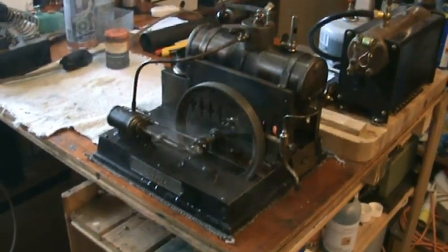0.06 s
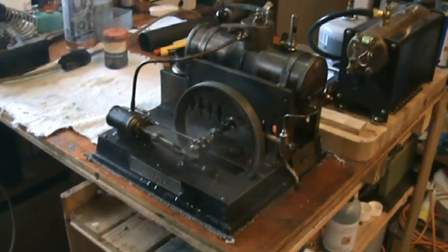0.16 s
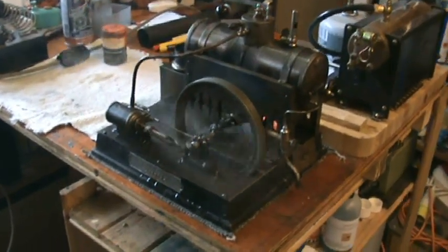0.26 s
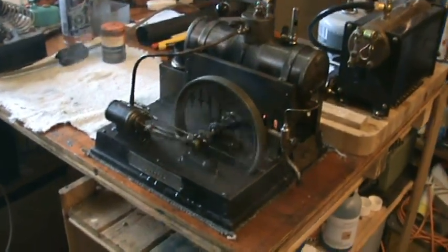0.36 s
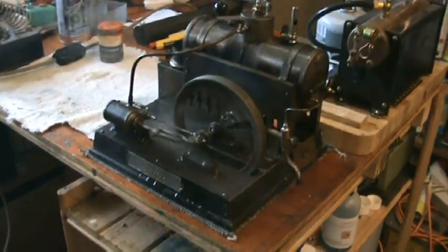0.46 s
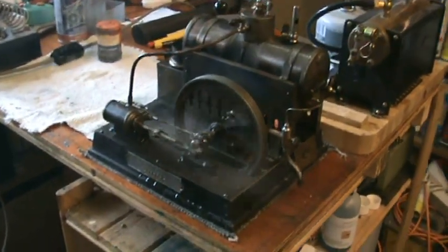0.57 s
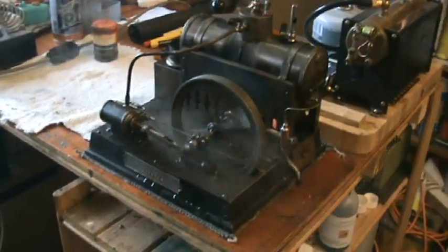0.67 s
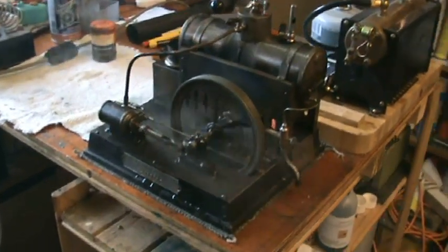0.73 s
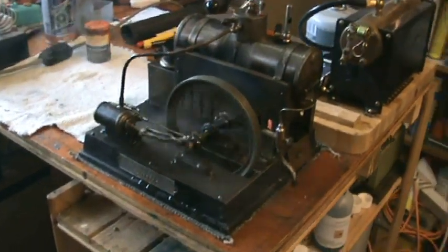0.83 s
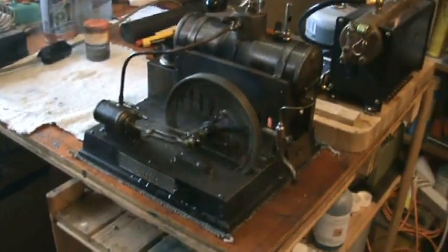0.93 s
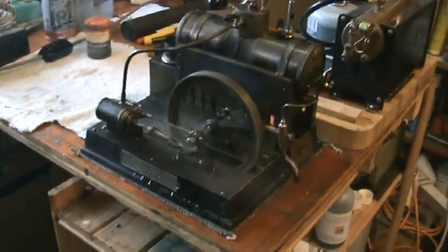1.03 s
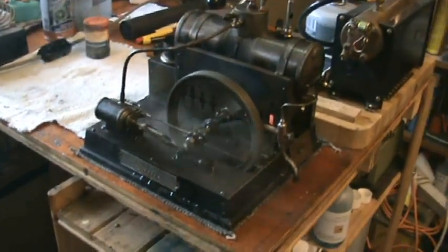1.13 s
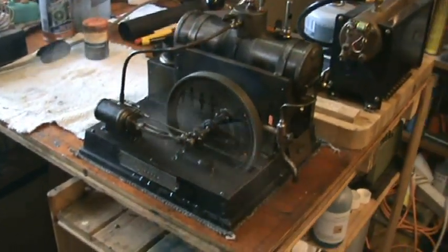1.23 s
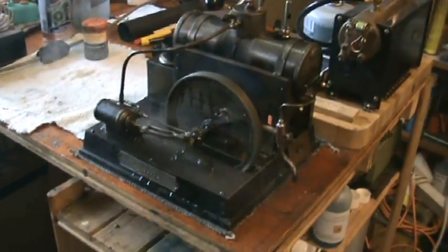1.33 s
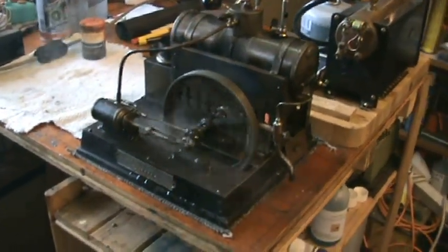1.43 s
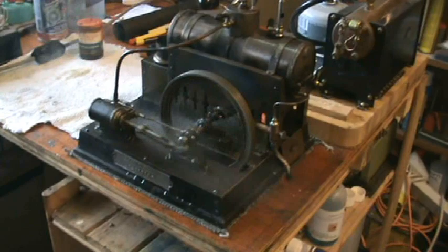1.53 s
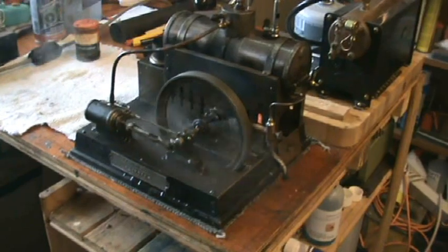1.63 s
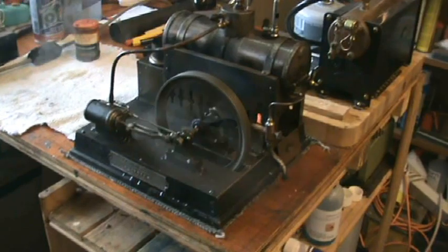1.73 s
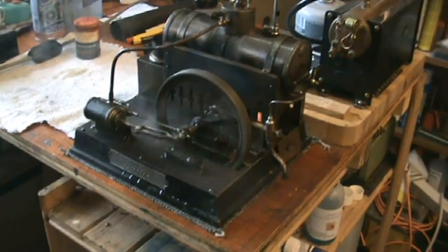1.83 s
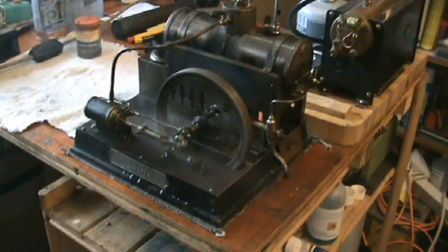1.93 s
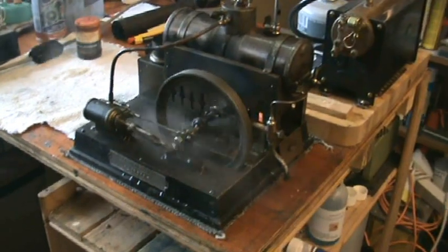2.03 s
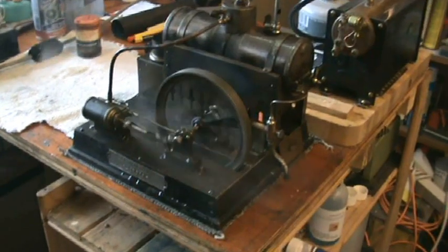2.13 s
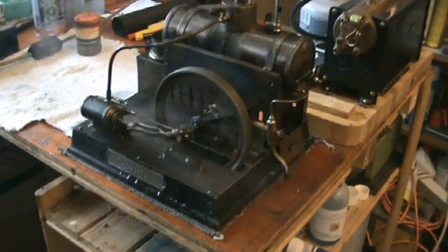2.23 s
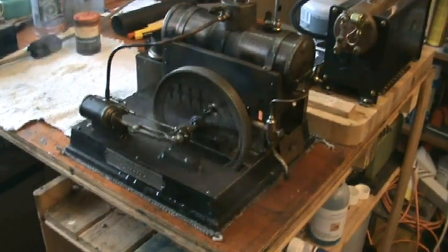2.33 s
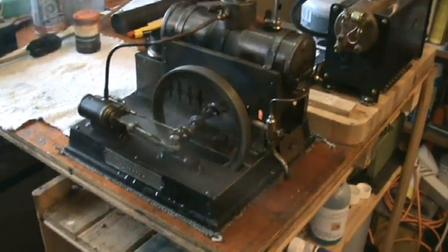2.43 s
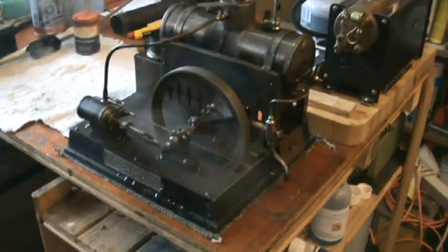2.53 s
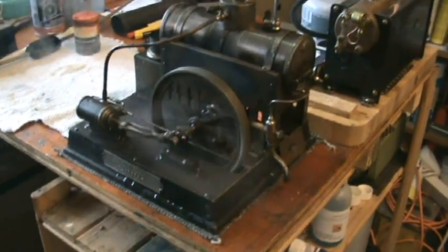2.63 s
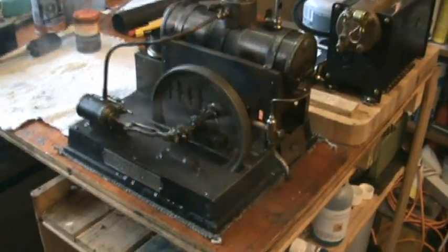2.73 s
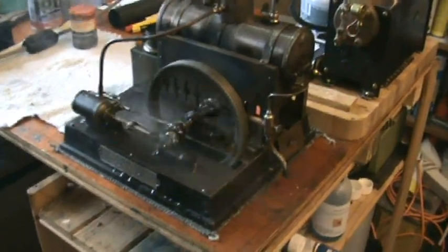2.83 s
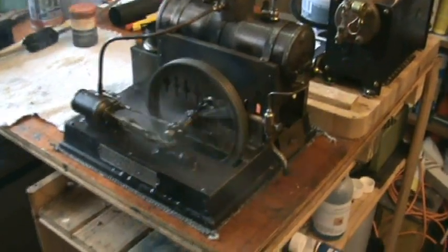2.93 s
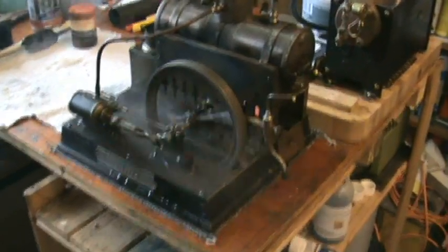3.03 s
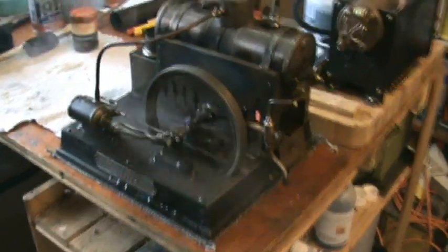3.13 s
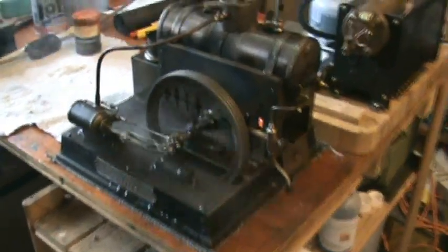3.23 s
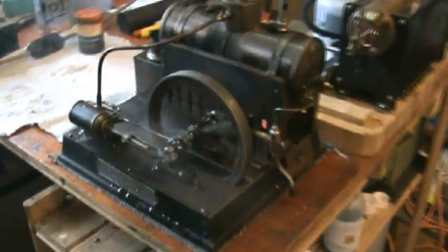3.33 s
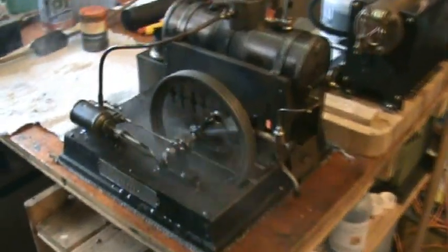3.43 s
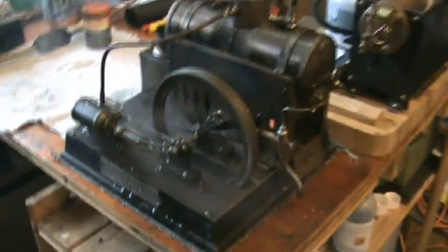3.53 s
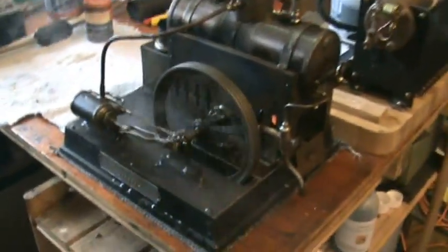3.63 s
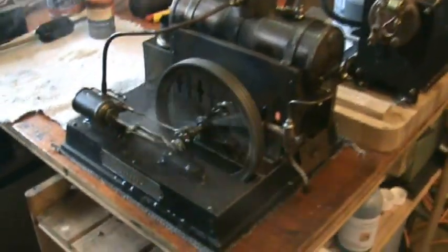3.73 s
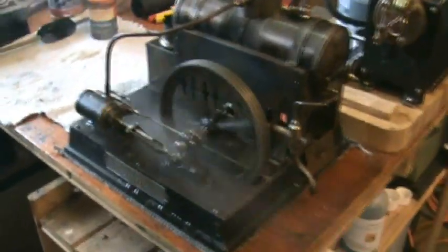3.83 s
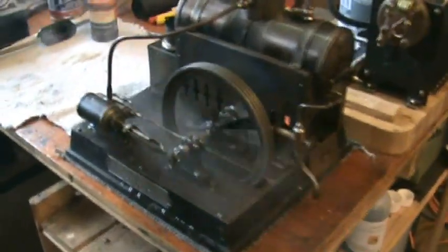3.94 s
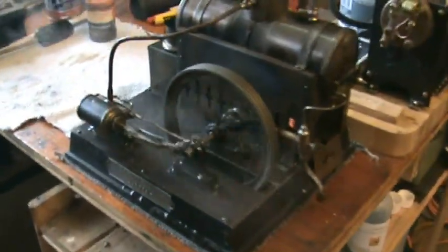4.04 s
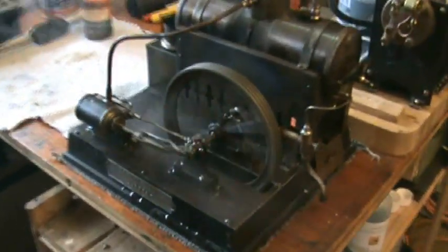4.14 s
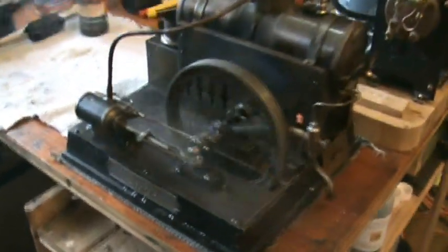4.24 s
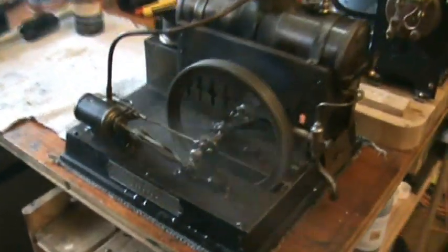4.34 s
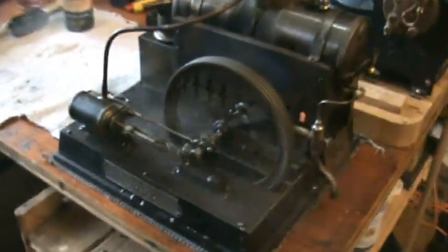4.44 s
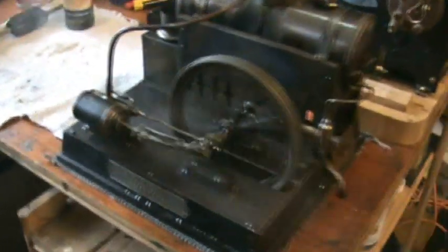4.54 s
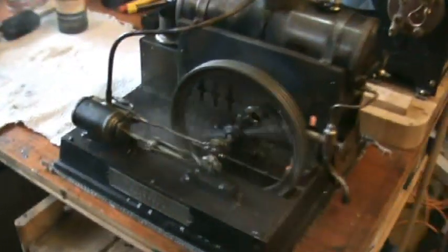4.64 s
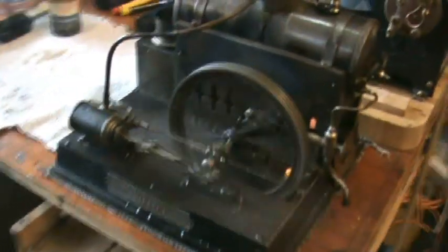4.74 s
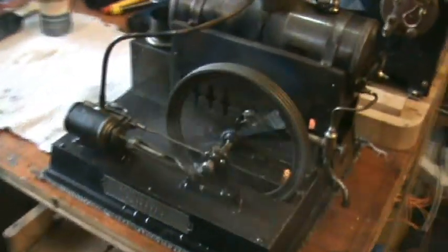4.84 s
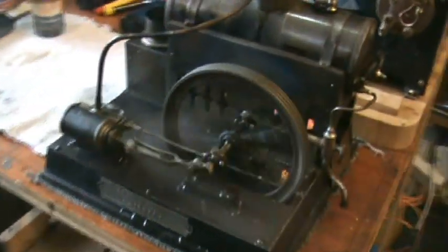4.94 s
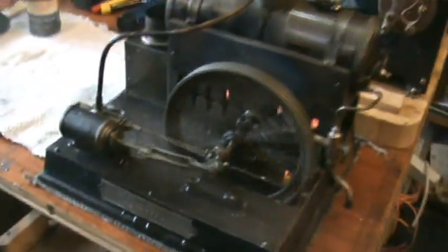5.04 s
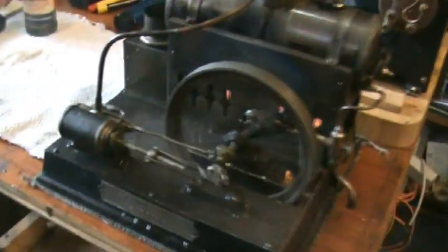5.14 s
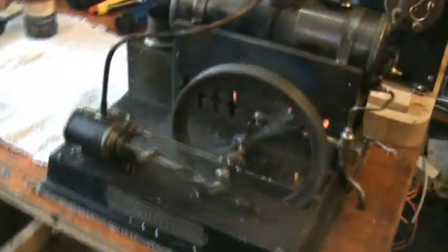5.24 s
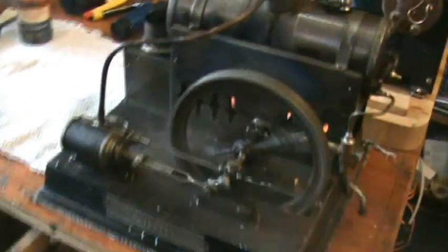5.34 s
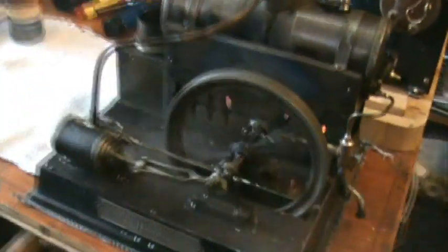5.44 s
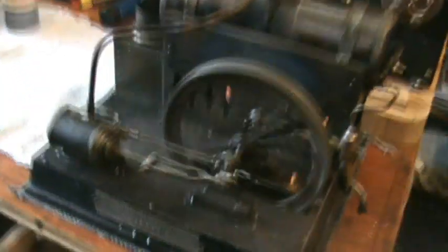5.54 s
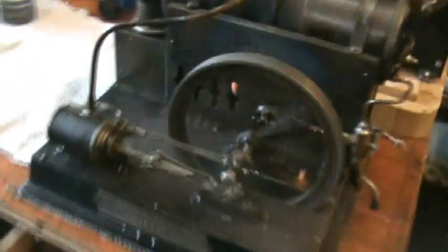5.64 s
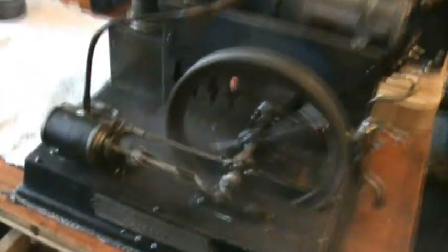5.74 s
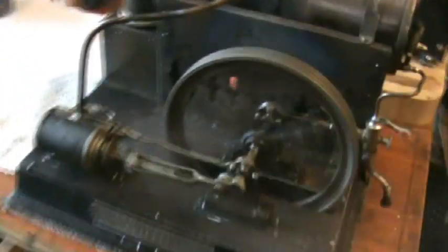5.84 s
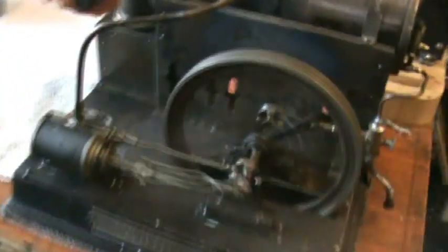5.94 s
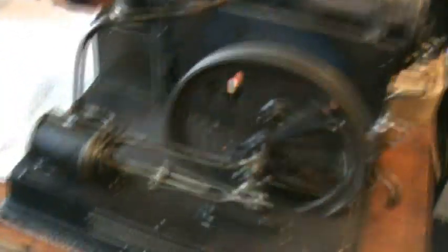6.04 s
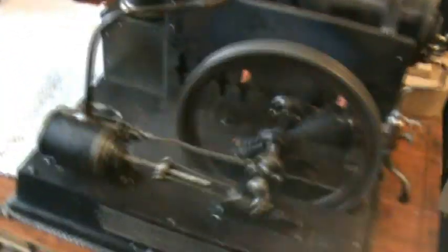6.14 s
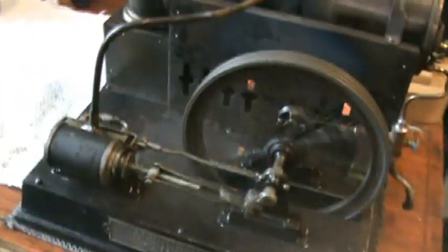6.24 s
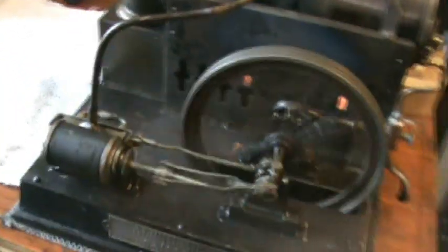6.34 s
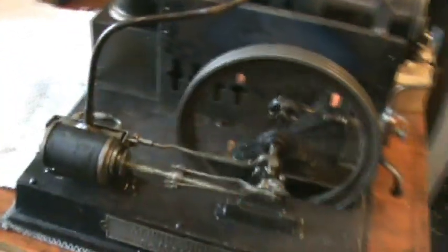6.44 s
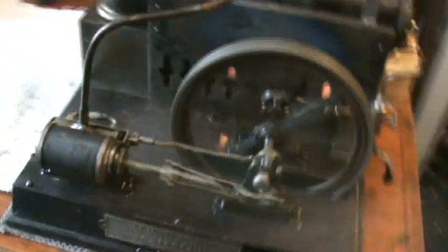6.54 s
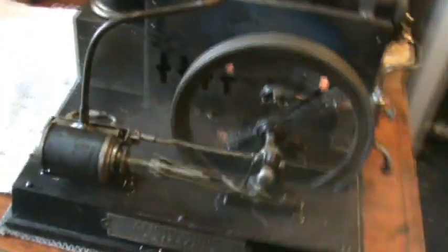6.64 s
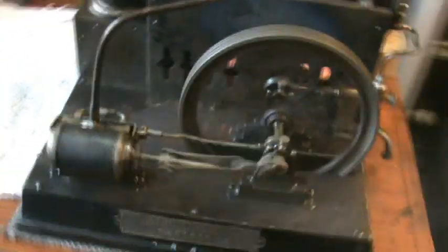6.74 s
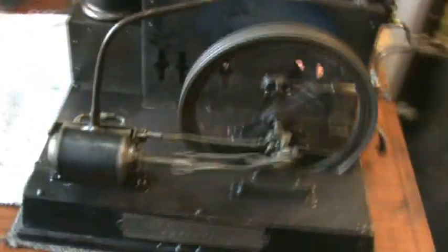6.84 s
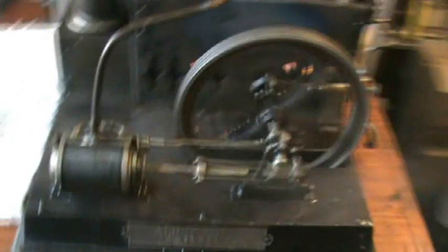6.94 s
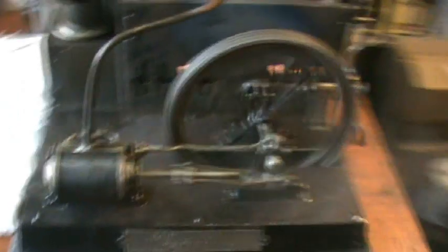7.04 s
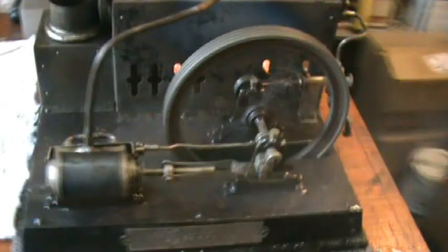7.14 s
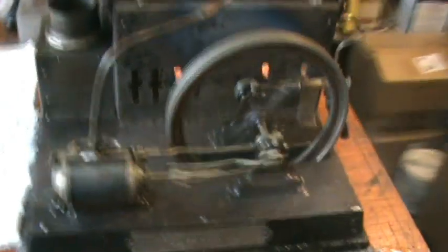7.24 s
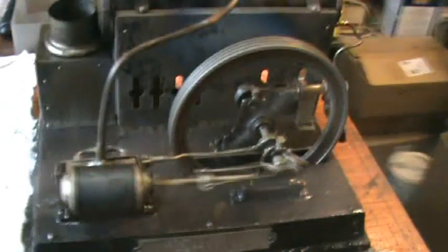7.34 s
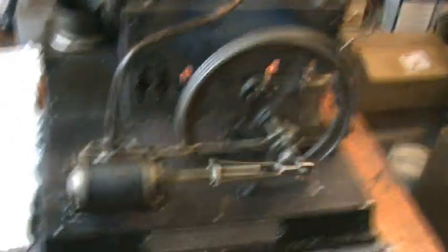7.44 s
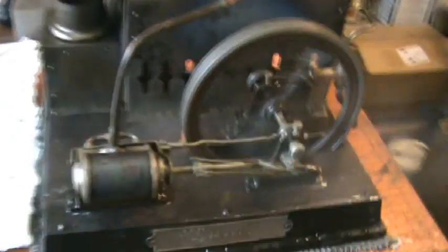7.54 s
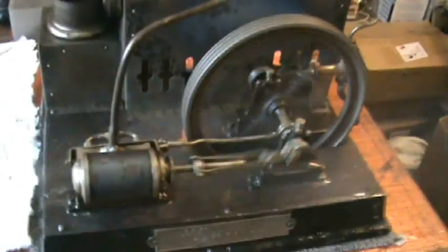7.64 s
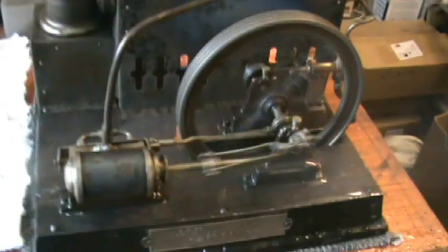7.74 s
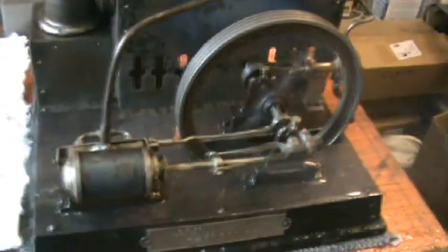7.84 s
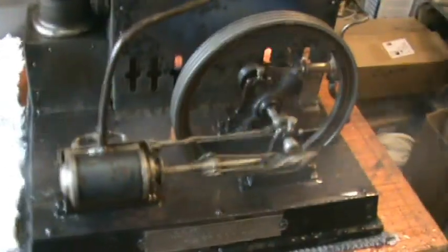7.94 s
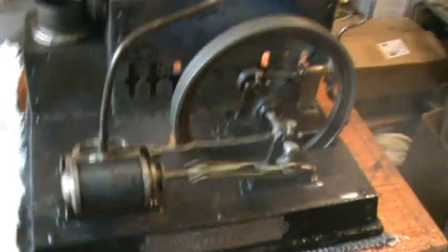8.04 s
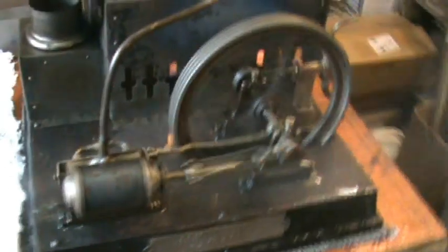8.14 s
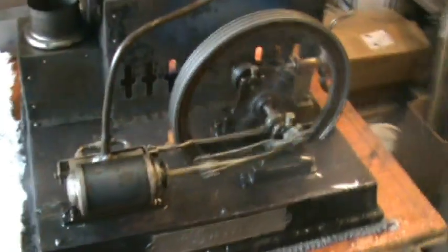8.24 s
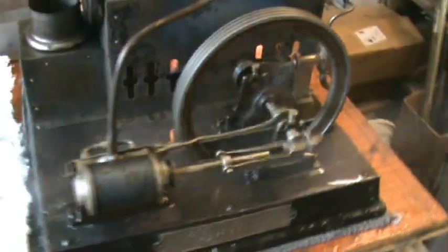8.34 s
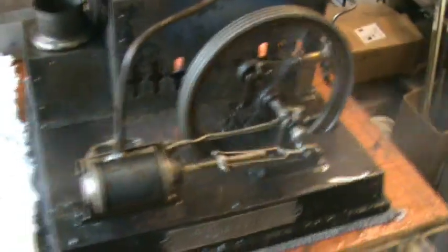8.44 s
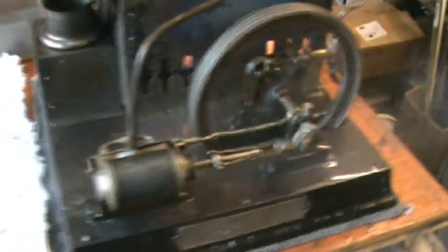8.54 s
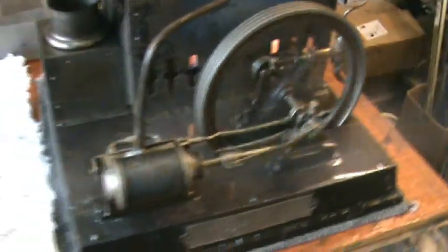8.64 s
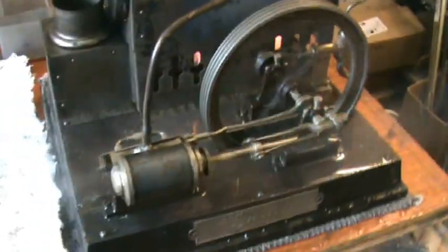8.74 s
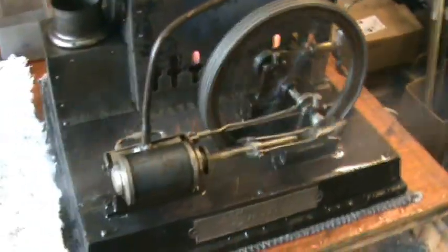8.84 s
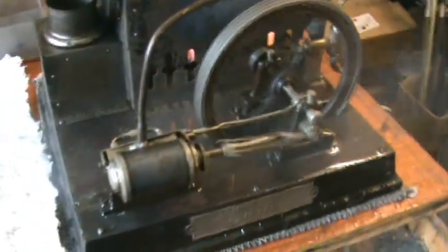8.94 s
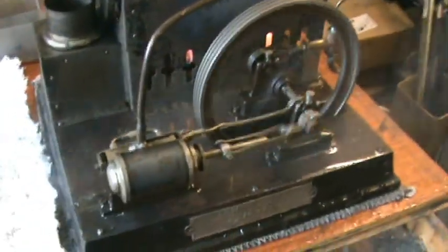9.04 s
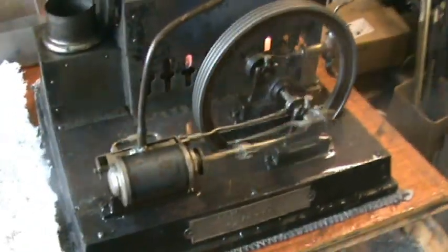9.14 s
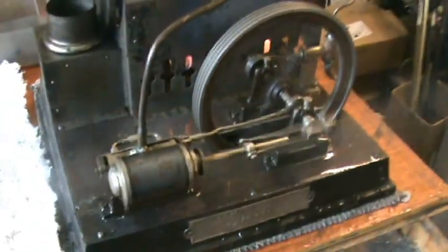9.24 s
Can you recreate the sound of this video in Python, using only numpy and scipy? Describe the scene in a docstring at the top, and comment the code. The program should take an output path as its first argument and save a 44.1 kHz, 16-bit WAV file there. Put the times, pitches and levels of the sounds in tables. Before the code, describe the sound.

Quick, bright hissing steam puffs with light metallic knocks and ticks from a small running engine; dull floor thuds midway as it sounds closer.

```python
"""A small double-acting steam engine runs on a workbench, over mains hum, still air and low rumble.
From the start, each half turn brings a hissing puff of steam, made of shaped noise that a valve curve
opens and shuts, and a knock, made of fading tones of the tin base; light ticks fall in between.
Someone walking round the bench makes a few dull thuds, rough pushes on ringing boards: one near 2.8 s, most
from 5.6 to 7.8 s. The engine sounds nearer in the second half, while the hum sinks towards the end."""
import sys
import numpy as np
from scipy import signal
from scipy.fft import rfft, irfft, next_fast_len
from scipy.io import wavfile
from scipy.ndimage import uniform_filter1d, map_coordinates

SR = 44100
rng = np.random.default_rng(int(sys.argv[2]) if len(sys.argv) > 2 else 0)


def log_audio(samples):
    """Write samples as a 16-bit WAV file to the path given in sys.argv[1]."""
    # one column per channel
    frames = np.atleast_2d(samples).T
    # limit to full scale, then quantise
    limited = np.clip(frames, -1, 1)
    pcm = np.round(limited * 32767).astype(np.int16)
    wavfile.write(sys.argv[1], SR, pcm)


N = 409248
T = np.arange(N) / SR  # time in seconds

# Slightly unsteady low tones of the hum. Each row: pitch in Hz, level in dB before the slow change.
HUM_TONES = [(70, -68), (99.9, -57.5)]
# Slow change of the hum. Each row: time in seconds, change in dB.
HUM_CHANGE = [(0, 4.5), (5.5, 2.5), (6.9, 0.5), (9.28, -2.5)]
# Colour of the room air. Each row: frequency in Hz, relative level in dB per Hz.
AIR_COLOUR = [(25, -7), (50, -21), (75, -13), (120, -8), (170, 2), (260, -7.5), (420, 3), (600, -6.5),
              (1000, -5), (2500, -9.5), (9000, -23), (15000, -38)]
# Low rumbling swells that come with the thuds. Each row: time in seconds, highest level in dB.
LOW_BUMPS = [(5.63, -56), (6.44, -47)]
RUMBLE_DB = -69  # steady rumble under the swells
BUMP_RISE_S, BUMP_T60_S = 0.061, 0.7  # rise through the last 20 dB; fall by 60 dB

# Dull thuds on the floor. Each row: start in seconds, peak in dB, tilt in dB per octave,
# time in seconds for the push to fall by 60 dB.
FLOOR_THUDS = [(2.827, -31, -1, 0.17), (5.623, -31, -8.5, 0.23), (6.362, -18.5, -3.5, 0.18),
               (6.377, -17, 5, 0.14), (6.384, -19, 0.5, 0.25), (6.421, -41, -6, 0.15), (7.122, -22, 3, 0.3),
               (7.169, -32, 6, 0.13), (7.289, -24.5, 2, 0.18), (7.788, -21.5, 0.5, 0.26)]
# Resonances of the floor boards. Each row: pitch in Hz, width in Hz, level in dB before the tilt.
FLOOR_BOARDS = [(170, 50, 0), (307, 38, 5), (400, 86, 0.5), (495, 164, -1), (765, 360, -6)]

# Piston reversals, outward and return in turn. Each row: time in seconds, knock level in dB.
REVERSALS = [(0.167, -27), (0.405, -23.5), (0.634, -28.5), (0.872, -22.5), (1.1, -27), (1.337, -25),
             (1.563, -25), (1.799, -25.5), (2.026, -25), (2.259, -23.5), (2.485, -25), (2.718, -23.5),
             (2.942, -24), (3.177, -23.5), (3.4, -25.5), (3.631, -22), (3.854, -23.5), (4.086, -27.5),
             (4.31, -25.5), (4.543, -21.5), (4.768, -22.5), (5.003, -21), (5.229, -22), (5.46, -21),
             (5.687, -21.5), (5.918, -23.5), (6.143, -19.5), (6.373, -18.5), (6.598, -19.5), (6.83, -20.5),
             (7.052, -19), (7.274, -21.5), (7.507, -19), (7.736, -19.5), (7.959, -20), (8.189, -22.5),
             (8.411, -19), (8.639, -21.5), (8.86, -19), (9.089, -20)]
# The listener's way round and nearer. Each row: time in seconds, middle of the pipe peak in Hz,
# nozzle peak in Hz, nearness in dB, pipe level in dB on outward puffs and on return puffs,
# nozzle level in dB.
LISTENER_WALK = [(0, 3120, 8920, 0.1, -22, -17.5, -16), (1.3, 3190, 8770, 0.1, -19.5, -17.5, -15),
                 (2, 3190, 8780, 0.2, -19.5, -17, -14.5), (3.2, 3260, 8940, 1.1, -25, -15, -17.5),
                 (3.7, 3280, 9150, 1.7, -26, -18, -18), (4.2, 3240, 9150, 1.4, -21, -15, -15.5),
                 (4.8, 3100, 8770, 1, -18.5, -17.5, -12), (5.5, 3010, 8380, 1.8, -15.5, -13.5, -13),
                 (6.2, 2900, 8330, 2.5, -16, -14, -15), (6.8, 2833, 7900, 3.1, -14, -12.5, -16.5),
                 (7.2, 2920, 7940, 2.9, -16.5, -12.5, -18), (7.6, 3110, 8240, 2.84, -15, -12, -13.5),
                 (8.5, 3156, 8220, 2.8, -15.5, -11.5, -13), (9.28, 3130, 8300, 2, -15, -10.5, -14.5)]
# Ringing modes of the tin base. Each row: pitch in Hz, level in dB for outward and for return knocks,
# time in seconds to fall by 60 dB, time in seconds to swell up.
BASE_MODES = [(287, 13, 3, 0.074, 0.0036), (383.5, 7.5, 14, 0.072, 0.0061), (439.5, 4.5, -7, 0.1, 0.0031),
              (633, -0.5, 2.5, 0.033, 0.00064), (792, 9, -4, 0.016, 0.00094),
              (952, -1, 0.5, 0.023, 0.00086), (1258, -3.5, -4, 0.032, 0.00031),
              (1720, 9, 0, 0.021, 0.00051), (2250, 11.5, -4, 0.0084, 0.00015)]
# How a knock is shared out; first row outward, second row return.
# Each row: level of the deep, the low and the bright crack modes in dB.
KNOCK_SHARES = [(-16.5, -9.5, -13.5), (-27, -12, -8.5)]
# Change with nearness, in one row: deep, low and crack modes in dB per dB of nearness.
KNOCK_NEARNESS = (0.9, -1.3, 2.2)
# Light ticks of the valve gear, once a turn. Each row: usual crank angle in degrees,
# level in dB relative to the knock, level of the low modes in dB.
VALVE_TICKS = [(106.1, -14, -6), (128, -35, 7), (316.4, -23.5, 6)]
KNOCK_SCATTER_DB = 2.5  # chance spread of each share
ECHO_DB, ECHO_PER_NEAR = -4.5, -1.5  # bounces and walls from afar; dB change per dB of nearness
BASE_CUT_HZ = 155  # the small base gives off little bass

# Exhaust puffs, outward then return. Each row: opening in degrees after the outward knock; attack, hold,
# release and linger in degrees; level in dB after the release and after the linger; jet level in dB.
EXHAUST_PUFFS = [(-44, 35.6, 68.5, 33.7, 77, -5.5, -10, -24.5),
                 (139, 43.2, 37.5, 60.2, 29.4, -7.5, -14.5, -26)]
PUFF_START_DB, FADE_DEG = -20, 32  # level a puff rises from; angle over which the last wisp dies
# Colour of the bare jet. Each row: frequency in Hz, relative level in dB per Hz.
JET_COLOUR = [(150, -5), (400, -12), (1000, -8.5), (1150, -10), (1500, -1.5), (2000, -1), (2500, 1),
              (4200, 1), (5500, 2.5), (7000, 0.5), (10500, -3), (12200, -7), (14000, -8), (15200, -60)]
# Peaks that stand out only from close by. Each row: pitch in Hz, width in Hz, relative level in dB.
CLOSE_PEAKS = [(1460, 150, -3), (12700, 1500, -10.5)]
CLOSE_DB, CLOSE_GROWS = -5.5, 3.6  # added from afar; dB per dB of nearness
# Upper shoulder of the nozzle peak. Each row: time in seconds, level in dB relative to the jet.
NOZZLE_SHOULDER = [(0, -4), (2.5, -3), (3.6, -1), (4.4, -5), (5.2, -17), (6.3, 0), (7, -5), (7.8, -9),
                   (9.28, -2)]
# Nozzle peak on return puffs. Each row: time in seconds, level in dB relative to the outward puffs.
NOZZLE_ON_RETURN = [(0, 0.5), (3, 0.5), (4.2, 1), (5, -1), (6.3, 0.5), (7, -6), (7.4, -1), (7.8, -1.5),
                    (9.28, 0.5)]
PIPE_GROWS, NOZZLE_GROWS = 1.25, 1.33  # dB per dB of valve opening
PIPE_WIDTH_HZ, NOZZLE_WIDTH_HZ, SHOULDER_WIDTH_HZ = 657, 800, 480
PIPE_LAG_DEG = 4.3  # the pipe fills after the valve opens
FLARE_DB = 0.64  # strength of the chance flaring of pipe and nozzle
WHISTLE_DB = -21.5  # whistle relative to the pipe peak
JET_CUT_HZ = 97  # the thin jet makes little bass

# Left-right likeness. Each row: frequency in Hz, likeness from 0 (unrelated) to 1 (the same).
LIKENESS = [(30, .88), (80, .95), (170, .83), (500, .88), (2000, .89), (8000, .89), (14000, .83)]
# Balance of the two microphone ports. Each row: frequency in Hz, left minus right in dB.
PORT_BALANCE = [(30, 5), (80, 0.3), (170, -0.5), (400, -0.5), (1400, -1.5), (5500, -0.9), (10000, -1.2),
                (13500, 2.5)]
TOP_HZ = 15200  # nothing passes above this


def amp(db):
    """Turn decibels into a plain multiplier."""
    return 10 ** (np.asarray(db) / 20)


def unit(x):
    """Scale to an rms level of one."""
    return x / np.sqrt(np.mean(x ** 2) + 1e-20)


def along(points, hz):
    """Read a table of frequency and value, with frequency on a log axis."""
    f, v = np.transpose(points)
    return np.interp(np.log(hz + 1), np.log(f + 1), v)


def curves(rows, t):
    """Read each column after the first at the times t."""
    s, *cols = np.transpose(rows)
    return [np.interp(t, s, c) for c in cols]


def wobble(rate):
    """A smooth random curve through a given number of chance points a second."""
    return map_coordinates(rng.standard_normal(int(N * rate / SR) + 4), [T * rate])


def filtered(x, response):
    """Multiply the spectrum of x by a response that depends on frequency."""
    m = next_fast_len(N + SR // 2)
    return irfft(rfft(x, m) * response(np.fft.rfftfreq(m, 1 / SR)), m)[..., :N]


def no_bass(x, cut_hz):
    """Weaken what lies below cut_hz, ever more towards the deepest bass."""
    return filtered(x, lambda hz: (1j * hz / (cut_hz + 1j * hz)) ** 2)


def spread(pair):
    """Blend two signals into left and right; unrelated ones get the room's likeness."""
    def shares(hz):
        turn = np.arccos(np.clip(along(LIKENESS, hz), -1, 1)) / 2
        return np.array([np.cos(turn), np.sin(turn)])

    mid, side = filtered(pair, shares)
    return np.array([mid + side, mid - side])


def add(x, s, sound):
    """Mix a sound in at s seconds."""
    start = round(s * SR)
    part = x[..., start:start + sound.shape[-1]]
    part += sound[..., :part.shape[-1]]


def room():
    """Hum is a few unsteady sines; air, and the low rumble that swells with the thuds, are coloured noise."""
    hum_change_db, = curves(HUM_CHANGE, T)
    hum = 0
    for hz, db in HUM_TONES:
        level = amp(db + 2.0 + 0.95 * wobble(19))
        hum = hum + level * np.sin(2 * np.pi * hz * T + 0.24 * wobble(6))
    air = unit(filtered(rng.standard_normal((2, N)), lambda hz: amp(along(AIR_COLOUR, hz))))
    rumble = unit(filtered(rng.standard_normal((2, N)), lambda hz: (hz > 15) / (1 + (hz / 36) ** 6)))
    rumble_level = amp(RUMBLE_DB)
    for s, db in LOW_BUMPS:
        drop = np.where(T < s, (s - T) / BUMP_RISE_S / 3, (T - s) / BUMP_T60_S)
        rumble_level = rumble_level + amp(db - 60 * drop)
    return amp(hum_change_db) * hum + spread(amp(-49) * air + rumble_level * rumble)


def thuds():
    """A soft contact is a short rough push that sets the floor boards ringing."""
    out, t = np.zeros((2, N)), np.arange(SR // 2) / SR
    f = np.fft.rfftfreq(len(t), 1 / SR)
    for s, db, tilt_db, t60 in FLOOR_THUDS:
        push = amp(-60 * t / t60) * (1 - np.exp(-t / 0.0017)) * rng.standard_normal((2, len(t)))
        boards = 0
        for k, (hz, width, level) in enumerate(FLOOR_BOARDS):
            gain = (-1) ** k * amp(level + tilt_db * np.log2(hz / 300))
            boards = boards + gain * 1j * f * width / (hz * hz - f * f + 1j * f * width)
        sound = irfft(rfft(push) * boards, len(t))
        add(out, s, amp(db) * sound / np.abs(sound).max())
    return spread(out)


def reversals():
    """Reversal times with one more turn at each end; the outward ones mark whole turns."""
    s = np.array(REVERSALS)[:, 0]
    return np.concatenate([s[:2] - (s[2] - s[0]), s, s[-2:] + (s[-1] - s[-3])])


def base(db, part_db, side, bounce_db):
    """The struck tin base rings in fading tones; slack lets the blow bounce twice, off its first spot."""
    t = np.arange(SR // 8) / SR
    hz, *levels, t60, swell = np.transpose(BASE_MODES)[:, :, None]
    deep_db, low_db, crack_db = part_db
    part = np.select([hz < 330, hz < 500, hz > 1400], [deep_db, low_db, crack_db])
    out = np.zeros(len(t))
    for lag, blow_db in [(0, 0), (0.011, bounce_db), (0.021, bounce_db - 2.5)]:
        level_drift, pitch_drift, phase = rng.normal(0, 1, (3, len(BASE_MODES), 1))
        level_db = db - 1 + blow_db + levels[side] + part + 1.2 * level_drift
        gain = amp(level_db - 60 * t / t60) * (1 - np.exp(-(t / swell) ** 2))
        angle = 2 * np.pi * hz * (1 + 0.015 * pitch_drift) * t
        angle = angle + np.pi * phase * (lag > 0)  # only bounces start at a chance phase
        add(out, lag, np.sum(gain * np.sin(angle), 0))
    return out


def linkage():
    """The crank takes up its play with a knock at each reversal; valve gear ticks at set crank angles."""
    out, s = np.zeros(N), reversals()
    near_db = curves(LISTENER_WALK, T)[2]
    echo_db = ECHO_DB + ECHO_PER_NEAR * near_db
    for k, (when, db) in enumerate(REVERSALS):
        side, now = k % 2, round(when * SR)
        part_db = KNOCK_SHARES[side] + near_db[now] * np.array(KNOCK_NEARNESS)
        part_db = part_db + rng.normal(0, KNOCK_SCATTER_DB, size=3)
        add(out, when, base(db, part_db, side, echo_db[now] - (0, 3)[side]))
    for turn in range(len(s) // 2):
        knock_db = np.interp(s[2 * turn], s[2:-2:2], np.array(REVERSALS)[::2, 1])
        for degrees, db, low_db in VALVE_TICKS:
            when = np.interp(360 * turn + degrees, 180 * np.arange(len(s)), s) + rng.normal(0, 0.003)
            tick_db = knock_db + db + rng.normal(0, 0.64)
            tick = base(tick_db, (low_db - 10.5, low_db, -6), 0, bounce_db=-6.5)
            if when > 0:
                add(out, when, tick)
    out = no_bass(out, BASE_CUT_HZ)
    # the walls answer with fading noise, more strongly from afar
    t = np.arange(SR // 4) / SR
    walls = unit(rng.standard_normal((2, len(t))) * amp(-60 * t / 0.22)) / np.sqrt(len(t))
    wet = signal.fftconvolve((out * amp(echo_db / 2))[None], walls, axes=1)[:, :N]
    # the bench edge answers late, and unequally left and right
    edge = np.roll(out, round(0.00328 * SR))
    return spread(np.array([out, edge])) + amp(-9.5) * wet


def ripple(pair, depth_db):
    """Echoes off boiler, bench and walls: fine peaks and dips, drawn by chance, that shift with time."""
    z = signal.stft(pair, nperseg=2048)[2]
    field = uniform_filter1d(rng.standard_normal(z.shape[1:]), size=2, axis=0)
    field = uniform_filter1d(field, size=7, axis=1)
    return unit(signal.istft(z * amp(depth_db * unit(field)), nperseg=2048)[1][:, :N])


def puff(degrees, opens, attack, hold, release, linger, release_db, linger_db):
    """Valve opening in dB over one turn: attack, hold, release, then a lingering wisp."""
    corners = np.cumsum([0, attack, hold, release, linger, FADE_DEG])
    levels_db = [PUFF_START_DB, 0, 0, release_db, linger_db, 2 * PUFF_START_DB]
    return np.interp((degrees - opens) % 360, corners, levels_db)


def steam():
    """Wet steam rushes out as rough noise with a pipe peak and a nozzle peak, gated by the valve."""
    noise = ripple(rng.standard_normal((2, N)), depth_db=3.0)
    hz, t, z = signal.stft(noise, SR, nperseg=256, noverlap=192)
    f = hz[:, None]

    def both(db):
        """Add the power of outward and return puffs."""
        return np.sum(amp(db) ** 2, axis=0)

    def peak(centre_hz, width_hz):
        return 1 / (1 + ((f - centre_hz) / width_hz) ** 2) ** 2

    s = reversals()
    degrees = np.interp(t, s, 180 * np.arange(len(s))) % 360
    pipe_hz, nozzle_hz, near_db, *pipe_db, nozzle_db = curves(LISTENER_WALK, t)
    valve_db = np.array([puff(degrees, *row[:-1]) for row in EXHAUST_PUFFS])
    late_db = np.array([puff(degrees - PIPE_LAG_DEG, *row[:-1]) for row in EXHAUST_PUFFS])
    pipe_flare_db = FLARE_DB * np.interp(t, T, wobble(5.5))
    nozzle_flare_db = FLARE_DB * np.interp(t, T, wobble(7))
    jet_db = np.array(EXHAUST_PUFFS)[:, -1:]
    return_db = np.outer([0, 1], curves(NOZZLE_ON_RETURN, t))

    blast = both(valve_db + jet_db + near_db)
    pipe = both(PIPE_GROWS * late_db + pipe_db + pipe_flare_db)
    # the two cylinder ends blow through unequal passages
    pipe_hz = pipe_hz * (1 - 0.0276 * np.cos(np.radians(degrees - 40)))
    nozzle = both(NOZZLE_GROWS * valve_db + return_db + nozzle_db + nozzle_flare_db)
    nozzle = nozzle * peak(nozzle_hz, NOZZLE_WIDTH_HZ)
    shoulder = amp(curves(NOZZLE_SHOULDER, t)[0]) ** 2 * peak(1.113 * nozzle_hz, SHOULDER_WIDTH_HZ)
    close = 0
    for centre, width, db in CLOSE_PEAKS:
        close = close + amp(db + CLOSE_DB + CLOSE_GROWS * near_db) ** 2 * peak(centre, width)
    jet = blast * (amp(along(JET_COLOUR, f)) ** 2 + close + shoulder)
    power = jet + pipe * peak(pipe_hz, PIPE_WIDTH_HZ) + nozzle

    # chance patches of louder and softer sound in pitch and time
    patches = uniform_filter1d(uniform_filter1d(rng.standard_normal(power.shape), 3, 0), 16, 1)
    shaped = z * np.sqrt(power) * amp(0.53 * unit(patches))
    pair = signal.istft(shaped, SR, nperseg=256, noverlap=192)[1][:, :N]
    # droplets tear the jet: all bands flicker together
    sputter = amp(0.82 * wobble(350) + 0.37 * wobble(45))
    # the pipe half whistles: an unsteady tone just under the middle of its peak
    cycles = np.cumsum(np.interp(T, t, 0.97 * pipe_hz) + 45 * wobble(14)) / SR
    whistle_level = amp(WHISTLE_DB) * np.interp(T, t, np.sqrt(pipe)) * wobble(70)
    whistle = whistle_level * np.sin(2 * np.pi * cycles)
    return no_bass(spread(pair * sputter) + whistle, JET_CUT_HZ)


def scene():
    """Everything together, from the background to the steam."""
    return room() + thuds() + linkage() + steam()


def record(dry):
    """Two microphone ports of slightly different colour, with the lowest and highest sound cut off."""
    def ports(hz):
        half_db = along(PORT_BALANCE, hz) / 2
        return amp(half_db * np.array([[1], [-1]])) * (hz < TOP_HZ) * (hz > 12)

    return filtered(dry, ports)


dry = scene()
out = record(dry)
log_audio(out)
```